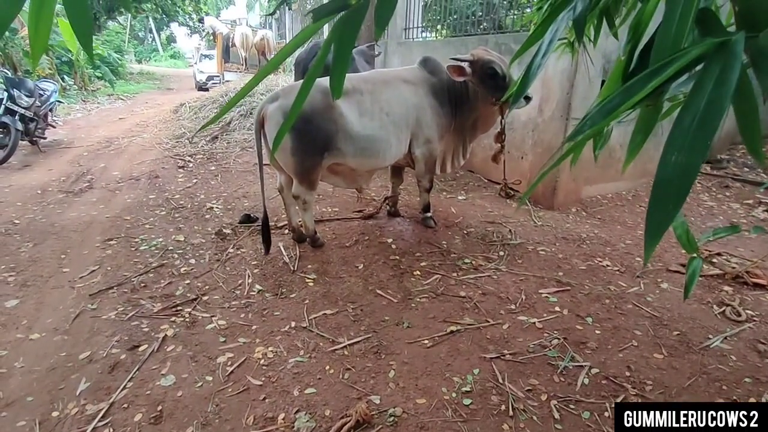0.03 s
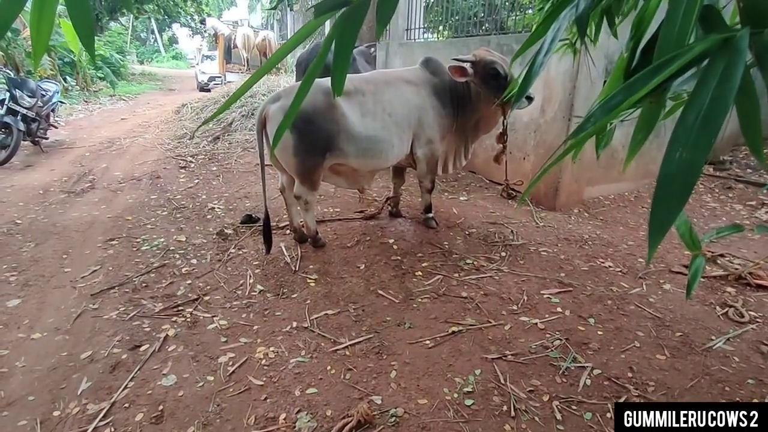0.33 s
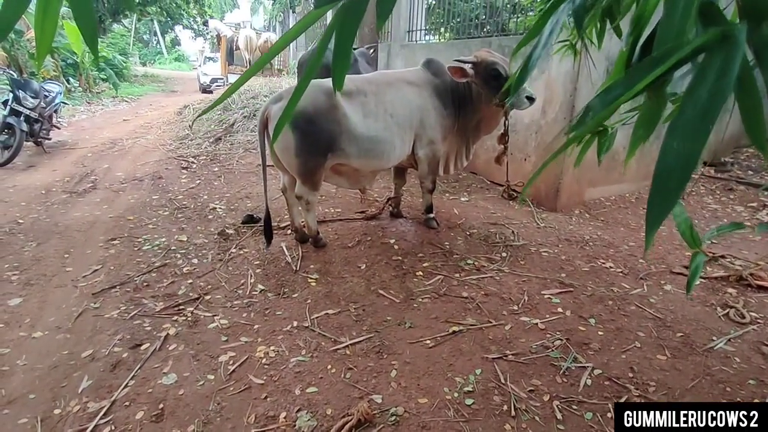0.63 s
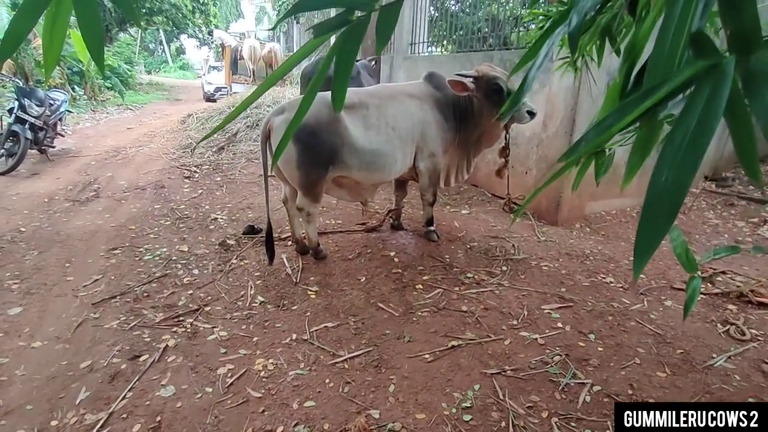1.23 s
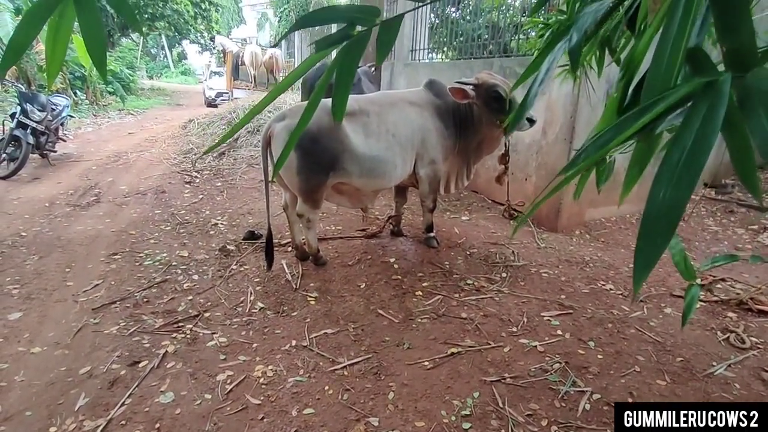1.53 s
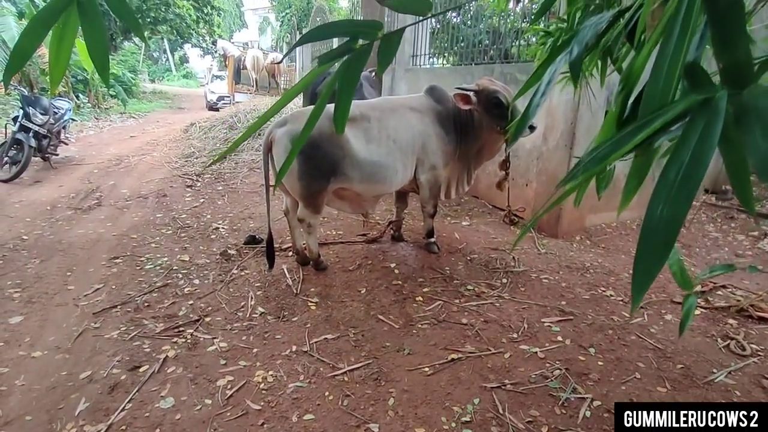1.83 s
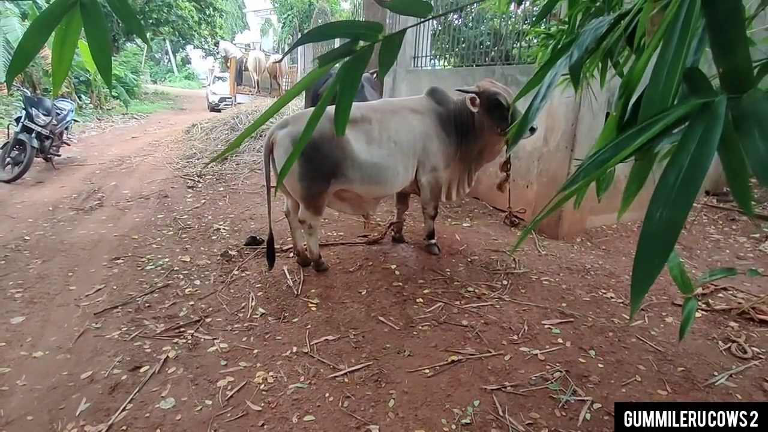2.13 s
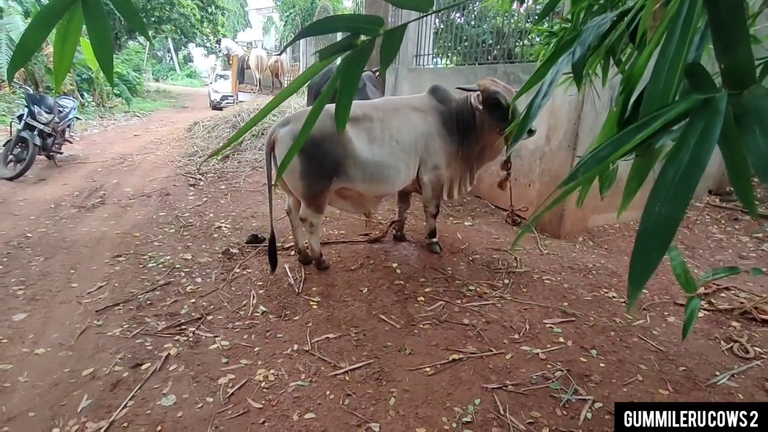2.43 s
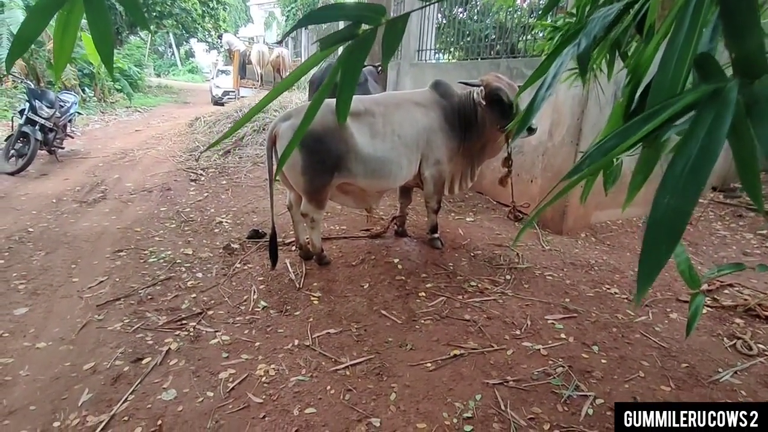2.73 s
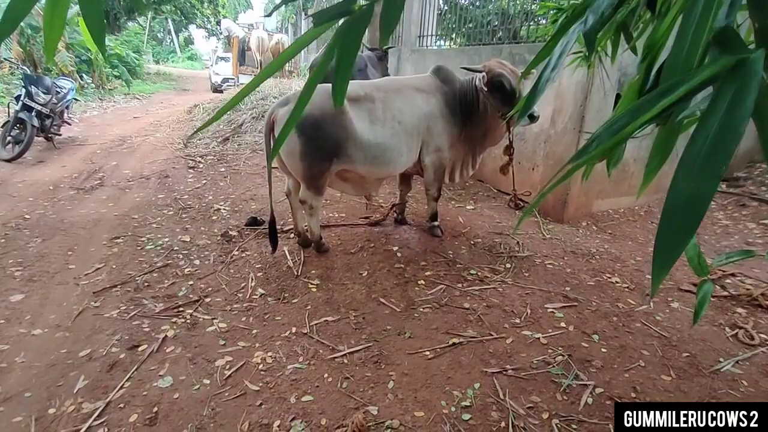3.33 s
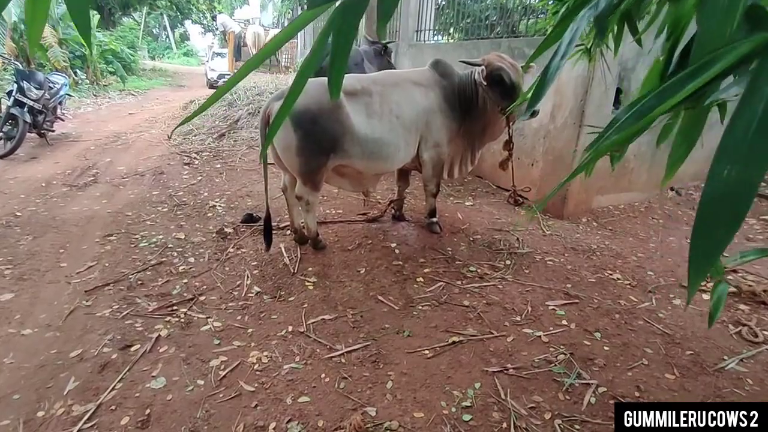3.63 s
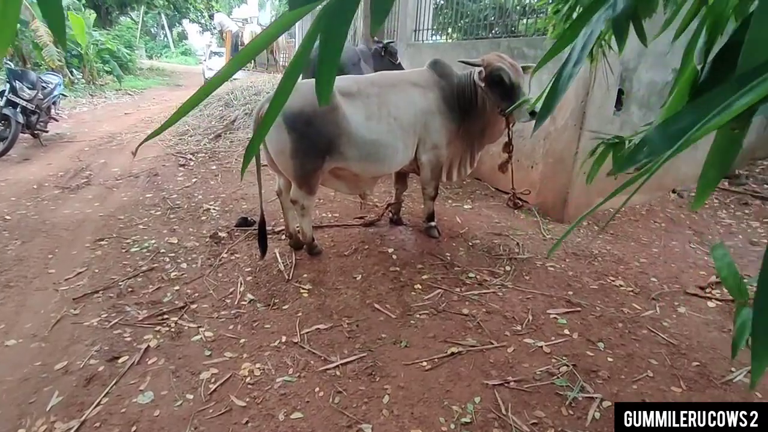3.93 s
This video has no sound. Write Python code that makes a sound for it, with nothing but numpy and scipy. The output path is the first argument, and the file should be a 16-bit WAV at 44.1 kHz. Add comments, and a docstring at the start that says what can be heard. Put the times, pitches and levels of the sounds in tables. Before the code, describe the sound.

A bull close by lets out a high, trumpeting bellow that breaks downward and ends hoarse. Low traffic rumble continues along the roadside, thin birdlike whistles come in, and a loud two-tone vehicle horn buzzes at the end.

```python
"""Bull and horn on a village road

A tethered bull gives a high, trumpeting bellow beside a wall; its voice breaks downward twice and
ends hoarse. Traffic rumbles, and thin, birdlike whistles come from the trees. Then a two-tone
vehicle horn buzzes on alternating pitches, so loud that the gain control ducks everything else."""
import sys
import numpy as np
from scipy import signal
from scipy.fft import rfft, irfft
from scipy.io import wavfile
from scipy.ndimage import uniform_filter1d

SR = 44100
rng = np.random.default_rng(int(sys.argv[2]) if len(sys.argv) > 2 else 0)


def generate_wav(signal):
    """Clip the signal to [-1, 1] and save it as 16-bit WAV at the path in sys.argv[1]."""
    frames = np.transpose(np.atleast_2d(signal))
    scaled = np.clip(frames, -1, 1) * 32767
    pcm = np.round(scaled).astype(np.int16)
    wavfile.write(sys.argv[1], SR, pcm)


N = 176400
T = np.arange(N) / SR

# the bull's held top note (time [s], pitch [Hz], relative levels of partials 1, 2, 3, 4 and of the
# treble [dB], left over right for partial 2 [dB])
TOP_NOTE = [(0, 840, -16, -11, -33, -25, -70, 1), (0.048, 855, -13.5, -13, -53, -25, -70, 3),
            (.11, 835.2, -17.5, -15.5, -37, -27.5, -61, 1),
            (0.241, 840.6, -22, -11.5, -44.5, -39.5, -62.5, 2.5),
            (0.348, 841.6, -21, -20, -54, -52, -60.5, 16), (0.551, 836.5, -21.5, -19, -47, -42.5, -50, 17),
            (0.67, 831.5, -22, -20.5, -47.5, -43.5, -48.5, -3.5),
            (0.758, 823, -28, -17, -42, -62, -49, -12), (0.828, 800.5, -40, -19.5, -43, -37, -55.5, -3.5)]
# the falling end of the bellow (time [s], pitch [Hz], effort [dB])
FALLING_END = [(0.843, 703.3, -22), (0.901, 701.4, -22), (0.978, 690, -20), (0.989, 629.7, -20),
               (1.088, 607.4, -23), (1.15, 559.3, -23.5), (1.2, 535, -37), (1.26, 532, -69)]
# colour of the top note from partial 5 up (frequency [Hz], gain [dB])
TREBLE_COLOUR = [(4200, -2.5), (5000, -9), (5850, 7), (6700, -3.5), (7550, -23), (8300, -22.5), (9200, -12),
                 (10200, -39.5), (12500, -32)]
# throat resonances that the falling partials sweep through (frequency [Hz], gain [dB])
THROAT_COLOUR = [(500, -8), (625, -11), (700, -1), (1050, -12), (1220, -12.5), (1420, -14.5), (1650, 3),
                 (1870, -23), (2110, -14), (2330, -13.5), (2520, -38), (3500, -39), (5200, -52),
                 (5600, -37.5), (6000, -66)]
# a second vibration in the throat puts side tones beside the lowest partial (time [s], depth [dB])
SIDE_TONE_DEPTH = [(.1, -28), (.25, -13), (.4, -32), (.68, -20), (.75, -3), (.81, 0), (.85, -18),
                   (1.1, -14), (1.2, -10)]
# horn blasts (start [s], length [s], horn [0 low, 1 high], relative level [dB], partial 2 gain [dB])
HORN_BLASTS = [(3.711, 0.038, 0, 3.5, -5.5), (3.754, 0.063, 1, -3, 3.5), (3.835, 0.053, 1, -0.5, 6),
               (3.886, 0.0466, 0, -5, 4), (3.949, 0.038, 0, -10, 0)]
# colours of the low and the high horn (frequency [Hz], gain [dB])
LOW_HORN_COLOUR = [(480, -14), (960, -7), (1440, -5), (1920, -7.5), (2400, -1), (2900, -6), (3400, -1.5),
                   (3850, -6.5), (4400, -18), (5300, -15), (7000, -25.5), (10000, -29.5), (14000, -42)]
HIGH_HORN_COLOUR = [(570, -11.5), (1140, -3), (1710, 7), (2290, -1.5), (2860, -6), (3430, -3), (4000, -7),
                    (5200, -12.5), (7000, -20.5), (10000, -22.5), (14000, -39)]
# notes from the trees (start [s], length [s], pitch [Hz], level [dB])
WHISTLE_NOTES = [(2.832, 0.29, 6434, -47.5), (3.111, 0.14, 7600, -50.5), (3.15, 0.12, 6460, -51),
                 (3.275, 0.17, 6500, -56), (3.276, 0.065, 9820, -67), (3.43, 0.16, 7600, -49.5),
                 (3.463, 0.158, 6580, -46.5), (3.286, 0.049, 6000, -54), (3.571, 0.035, 5900, -42),
                 (3.588, 0.063, 9700, -58.5), (3.596, 0.13, 6520, -41.5)]
# colour of the traffic noise (frequency [Hz], relative density [dB])
TRAFFIC_COLOUR = [(12, -37), (20, -12), (38, -1.5), (54, 2.5), (66, -4.5), (87, -10), (188, -12),
                  (386, -28), (884, -31.5), (1810, -36), (2900, -37), (12600, -65.5), (14800, -93)]
# level of the background rumble and hiss; the hiss is raised while the horn ducks it
# (time [s], rumble gain [dB], hiss gain [dB])
BACKGROUND_LEVELS = [(0, 12, 8.5), (.6, 5.5, 3), (1.1, 0, -2.5), (1.33, -1.5, 0.5), (1.601, 0, 2),
                     (1.9, -1, 1.5), (2.6, 0.5, 0), (3.2, 1.5, 2), (3.7, 1.5, 3), (4, 2.5, 14.5)]
# stereo image of the traffic (frequency [Hz], left-right correlation [-1 to 1])
TRAFFIC_IMAGE = [(60, 1), (150, 0.96), (370, 0.85), (930, -0.2), (2320, -0.041), (5780, 0.12),
                 (14400, -0.47)]
# ring of the lane (frequency [Hz], time to fall 60 dB [s])
LANE_DECAY = [(200, 0.35), (1500, 0.36), (4000, 0.5), (12000, 0.085)]

EDGE_HZ = 14800  # top of the band


def amp(db):
    """Decibels to gain."""
    return 10 ** (np.asarray(db) / 20)


def unit(x):
    """Scales to rms 1."""
    return x / np.sqrt(np.mean(x ** 2) + 1e-20)


def curve_at(points, hz):
    """Reads a curve on a log-frequency axis."""
    f, value = np.transpose(points)
    return np.interp(np.log(hz + 1), np.log(f + 1), value)


def wander(rate_hz):
    """Random drift of rms 1, up to about the given rate."""
    f = np.fft.rfftfreq(N, 1 / SR)
    return unit(irfft(rfft(rng.standard_normal(N)) / (1 + (f / rate_hz) ** 4), N))


def noise(colour):
    """Stereo noise of rms 1 with the given colour (frequency [Hz], gain [dB])."""
    gain = amp(curve_at(colour, np.fft.rfftfreq(N, 1 / SR)))
    return unit(irfft(rfft(rng.standard_normal((2, N))) * gain, N))


def power(x):
    """Mean power of both channels over 14 ms."""
    return abs(uniform_filter1d((x ** 2).mean(0), 600))


def partial(turns, hz, lag_s, pan_db):
    """A sine placed in stereo: the left side is lag_s later and pan_db louder."""
    left = amp(pan_db / 2) * np.sin(2 * np.pi * (turns - hz * lag_s))
    right = amp(-pan_db / 2) * np.sin(2 * np.pi * turns)
    return np.array([left, right])


def bull(break_s=.835, hoarse_s=1.2, side_hz=230, push_db=14, push_s=.57, wall_s=.057):
    """A breathy falsetto with side tones; it breaks downward, grows hoarse and echoes off the wall."""
    top_s, top_hz, *top_curves = np.transpose(TOP_NOTE)
    fall_s, fall_hz, fall_db = np.transpose(FALLING_END)
    *low_partials_db, treble_db, second_pan_db = [np.interp(T, top_s, c) for c in top_curves]
    effort_db = np.interp(T, fall_s, fall_db)
    pitch = np.interp(T, np.r_[top_s, fall_s], np.r_[top_hz, fall_hz])
    broken = np.clip((T - break_s) / .012 + .5, 0, 1)
    hoarse = np.clip((T - hoarse_s) / .076 + 1, 0, 1)
    hz = pitch * (1 + .003 * wander(90) + (.003 * broken + .025 * hoarse) * wander(200))
    turns = np.cumsum(hz) / SR
    side_turns = np.cumsum(side_hz * (1 + .156 * wander(81.6))) / SR
    side_tones = amp(np.interp(T, *np.transpose(SIDE_TONE_DEPTH))) * np.sin(2 * np.pi * side_turns)
    top_levels = low_partials_db + [treble_db + curve_at(TREBLE_COLOUR, k * pitch) for k in range(5, 16)]
    pan_db = {1: -7.5 * (1 - broken) + 3.5 * broken, 2: second_pan_db * (1 - broken), 4: -7.5}
    voice = np.zeros((2, N))
    for k, top_db in enumerate(top_levels, 1):
        db = (1 - broken) * top_db + broken * (effort_db + curve_at(THROAT_COLOUR, k * pitch))
        flutter_db = 3 * (k > 2) * wander(56)
        tone = partial(k * (turns + .25), k * hz, .00037 if k > 2 else .00046, pan_db.get(k, 0))
        voice += np.sqrt(2) * amp(db + flutter_db) * (1 + side_tones * (k == 1)) * tone
    breath = noise([(300, -33.5), (600, -13), (1700, -1), (3300, -13), (4500, -16.5), (12000, -37)])
    voice += amp(-28.5) * breath * np.sqrt(power(voice))
    opening_push = np.clip(1 - T / push_s, 0, 1)
    release = np.clip((fall_s[-1] - T) / .009 + 1, 0, 1)
    voice *= amp(1 + push_db * opening_push) * release
    # only the falling end slaps back, with left and right swapped
    wall_echo = np.roll((voice * broken)[::-1], round(wall_s * SR), axis=1)
    return voice + amp(-9) * wall_echo + amp(-13) * lane_echoes(voice)


def horn(low_hz=481, high_hz=571, sag_per_s=.22, attack_s=.0044, ring_s=.0028):
    """Two buzzing diaphragms are switched on in turn and ring down in the lane."""
    out = np.zeros((2, N))
    for start, length, is_high, db, second_db in HORN_BLASTS:
        pitch, colour = (high_hz, HIGH_HORN_COLOUR) if is_high else (low_hz, LOW_HORN_COLOUR)
        on = T >= start
        t = T[on] - start
        overshoot = .012 * np.exp(-t / .0079)  # each blast starts sharp
        sag = sag_per_s * (np.minimum(t, length) - length / 2)
        hz = pitch * (1 + overshoot - sag + .0075 * wander(93)[on])
        turns = np.cumsum(hz) / SR
        buzz = 0
        for k in range(1, int(EDGE_HZ / pitch) + 1):
            gain = amp(curve_at(colour, k * pitch) + second_db * (k == 2))
            buzz += gain * partial(k * turns + .5 * rng.random(), k * hz, lag_s=-.000469, pan_db=-3)
        rasp = noise([(750, -54), (1500, -6)] + list(colour[3:]))[:, on]
        rasp *= 1 + np.cos(2 * np.pi * turns)  # one puff per swing of the diaphragm
        envelope = np.minimum(t / attack_s, 1) * np.exp(-np.maximum(t - length, 0) / ring_s)
        out[:, on] += amp(db - .5) * envelope * (unit(buzz) + amp(-15) * rasp)
    return out + amp(-3.5) * lane_echoes(out)


def whistles(sag=.022, jitter=.01136):
    """Thin, unsteady, slightly sagging notes from the trees, more echo than direct sound."""
    out = np.zeros((2, N))
    for start, length, pitch, db in WHISTLE_NOTES:
        progress = np.clip((T - start) / length, 0, 1)
        hz = pitch * (1 + sag * (.5 - progress) + jitter * wander(240))
        phase = 2 * np.pi * np.cumsum(hz) / SR
        envelope = amp(db + 2.8 * wander(46)) * np.sin(np.pi * progress)
        out += envelope * (np.sin(phase) + amp(-24) * np.sin(2 * phase))
    return out + amp(5) * lane_echoes(out)


def traffic(engine_hz=54, crossover_hz=350):
    """Lumpy road rumble with a wavering engine note, under a soft hiss."""
    f = np.fft.rfftfreq(N, 1 / SR)
    left, spare = rfft(amp(-26) * noise(TRAFFIC_COLOUR))
    likeness = np.clip(curve_at(TRAFFIC_IMAGE, f), -1, 1)
    spectrum = np.array([left, likeness * left + np.sqrt(1 - likeness ** 2) * spare])
    lowpass = 1 / (1 + (f / crossover_hz) ** 4)
    engine_gain = amp(-36.5 + wander(2.7))
    engine_turns = np.cumsum(engine_hz * (1 + .023 * wander(9.9))) / SR
    rumble = irfft(spectrum * lowpass, N) + engine_gain * np.sin(2 * np.pi * engine_turns)
    hiss = irfft(spectrum * (1 - lowpass), N)
    times, rumble_db, hiss_db = np.transpose(BACKGROUND_LEVELS)
    rumble *= amp(np.interp(T, times, rumble_db) + .82 * wander(33))
    hiss *= amp(np.interp(T, times, hiss_db) + wander(12))
    return rumble + hiss


def lane_echoes(x):
    """Scattered reflections from walls and trees; the highest treble dies first."""
    taps = rng.standard_normal((2, SR)) * (rng.random((2, SR)) < .05) * (T[:SR] > .006)
    hz, t, bands = signal.stft(taps, SR, nperseg=256)
    decay = amp(-60 * t / curve_at(LANE_DECAY, hz)[:, None])
    tail = signal.istft(bands * decay, SR, nperseg=256)[1]
    tail /= np.linalg.norm(tail, axis=1, keepdims=True)
    return signal.fftconvolve(x, tail, axes=1)[:, :N]


def scene():
    """Everything heard from the roadside."""
    return bull() + horn() + whistles() + traffic()


def record(dry, threshold_db=-17, strength=.84, release_db_per_s=22, attack_s=.0039):
    """Gain control clamps the loud calls and recovers slowly; then soft clipping and the band limit."""
    sidechain = signal.sosfilt(signal.butter(2, 200, "high", fs=SR, output="sos"), dry)
    level_db = 10 * np.log10(power(sidechain) + 1e-12)
    release_db = T * release_db_per_s
    peak_db = np.maximum.accumulate(level_db + release_db) - release_db  # holds peaks, then sinks
    over_db = np.maximum(peak_db - threshold_db, 0)
    pole = np.exp(-1 / (attack_s * SR))
    smooth_over_db = signal.lfilter([1 - pole], [1, -pole], over_db - over_db[0]) + over_db[0]
    clipped = np.tanh(dry * amp(-strength * smooth_over_db))
    lowpass = signal.firwin(511, EDGE_HZ, window=("kaiser", 9), fs=SR)
    return signal.oaconvolve(clipped, lowpass[None], "same")


dry = scene()
out = record(dry)
generate_wav(out)
```